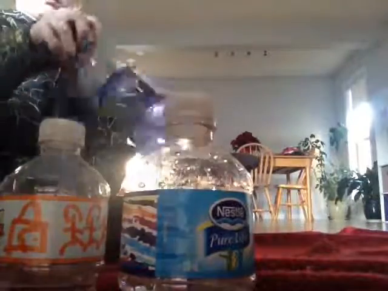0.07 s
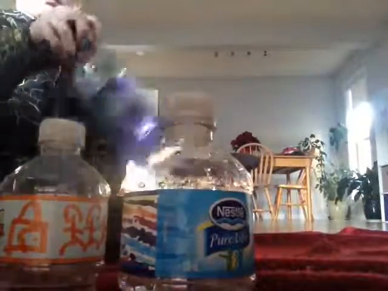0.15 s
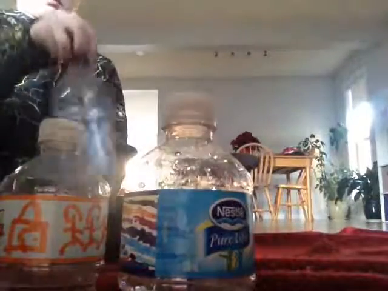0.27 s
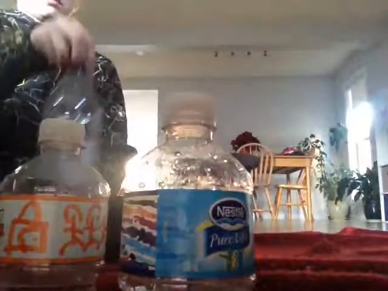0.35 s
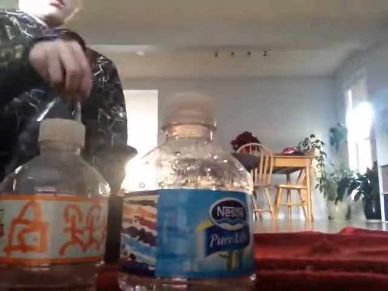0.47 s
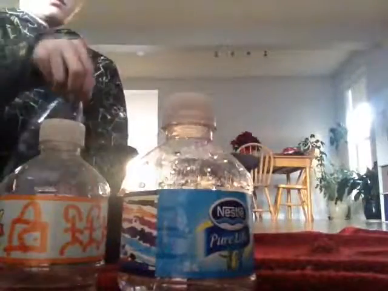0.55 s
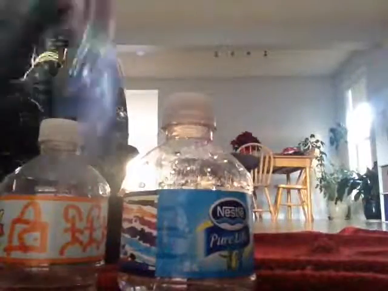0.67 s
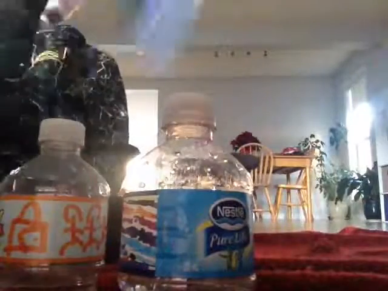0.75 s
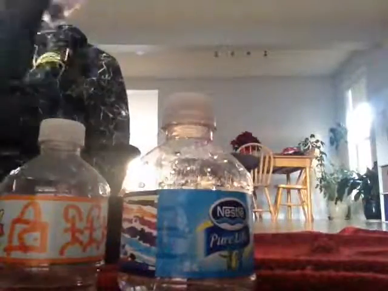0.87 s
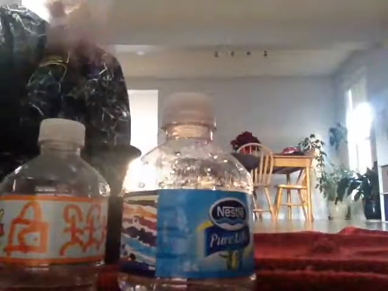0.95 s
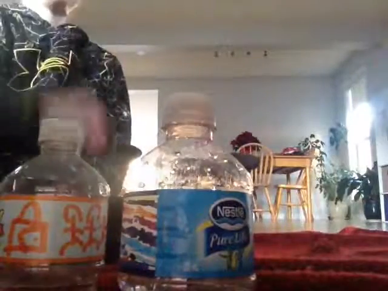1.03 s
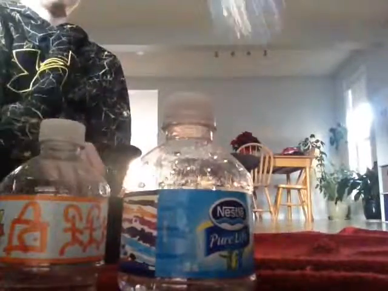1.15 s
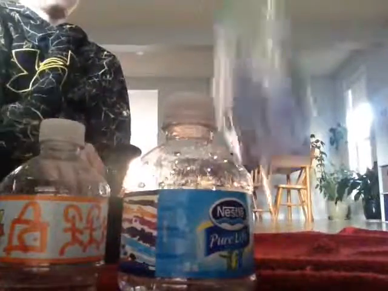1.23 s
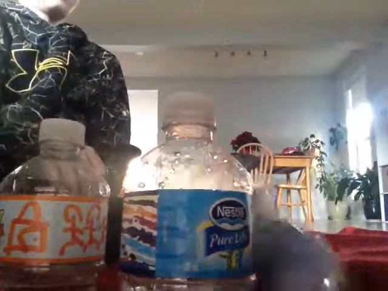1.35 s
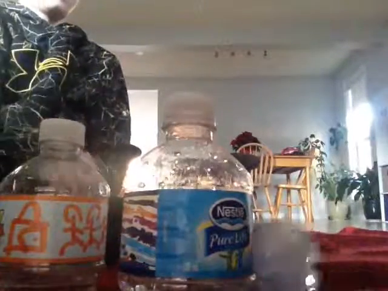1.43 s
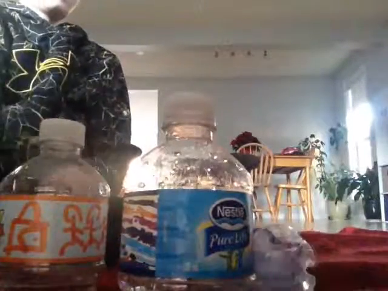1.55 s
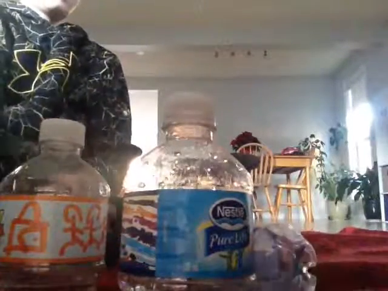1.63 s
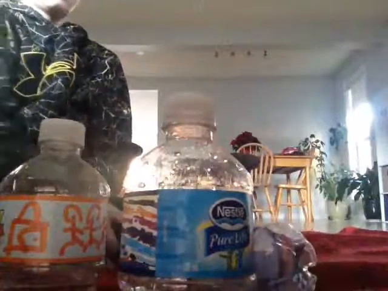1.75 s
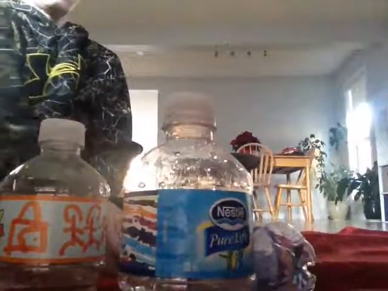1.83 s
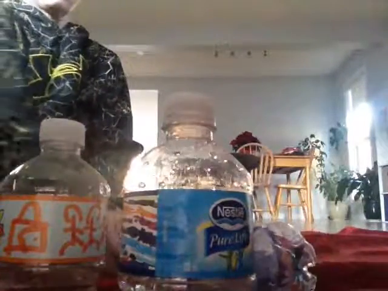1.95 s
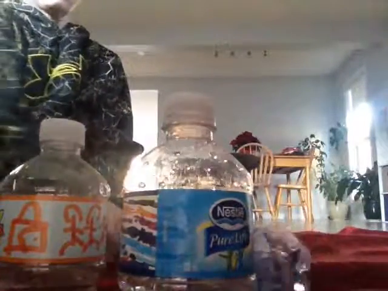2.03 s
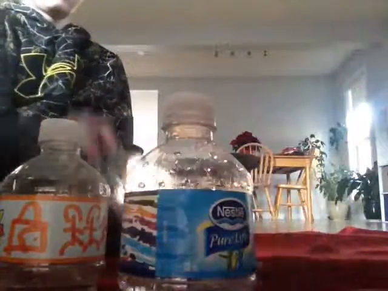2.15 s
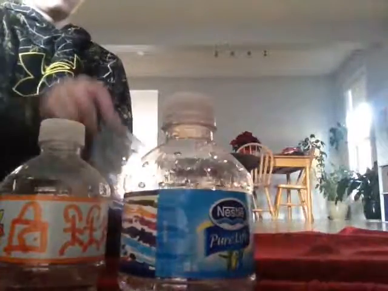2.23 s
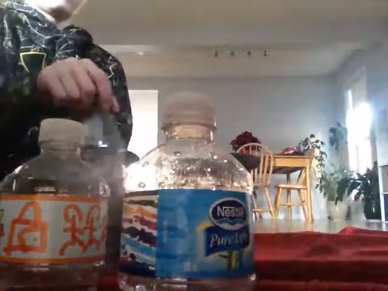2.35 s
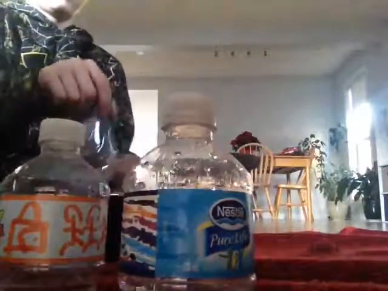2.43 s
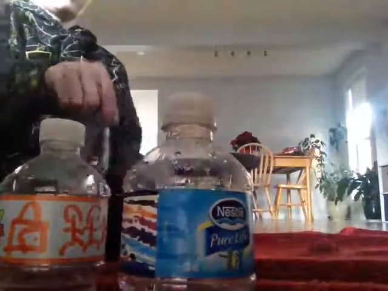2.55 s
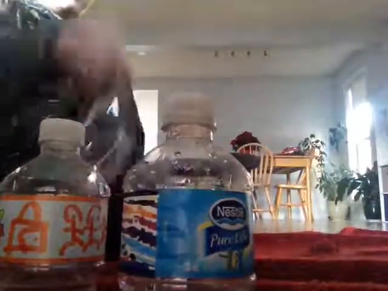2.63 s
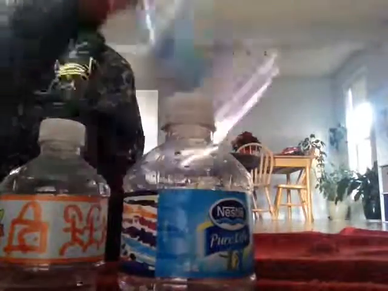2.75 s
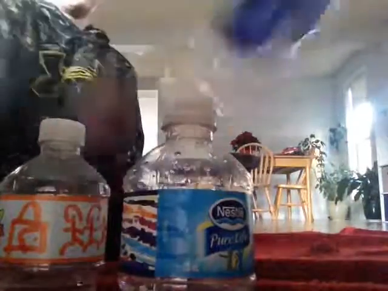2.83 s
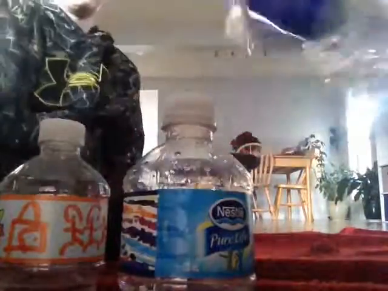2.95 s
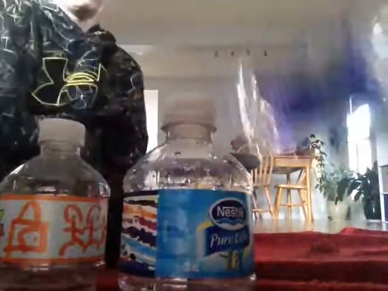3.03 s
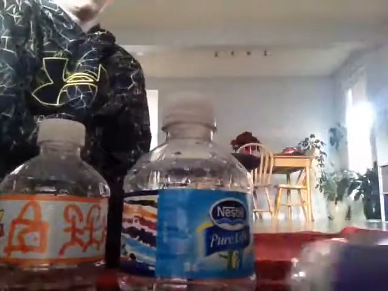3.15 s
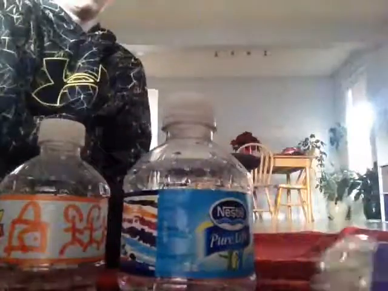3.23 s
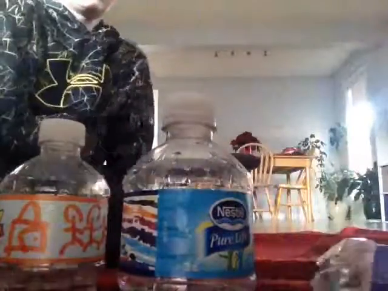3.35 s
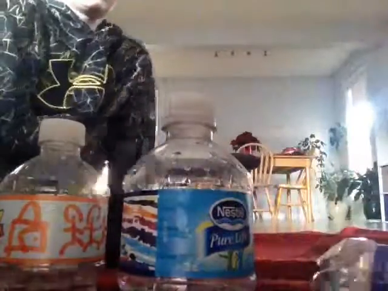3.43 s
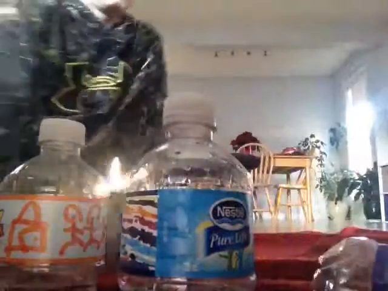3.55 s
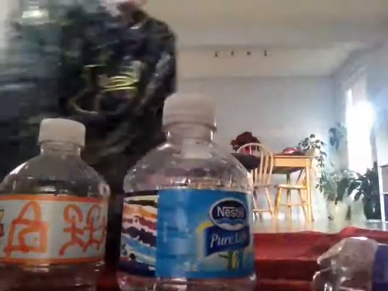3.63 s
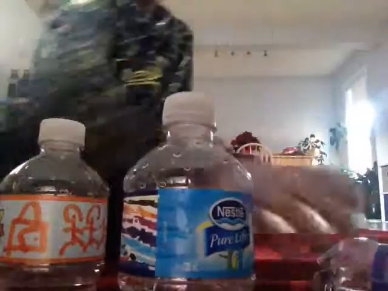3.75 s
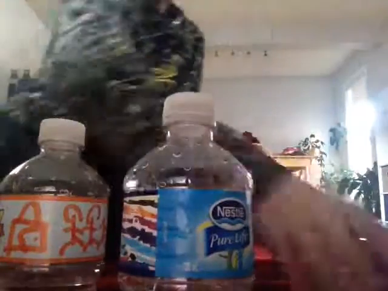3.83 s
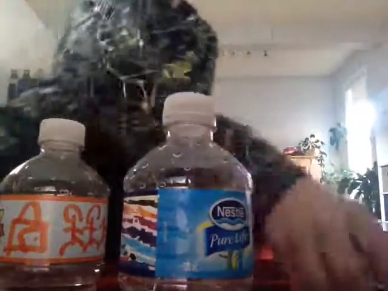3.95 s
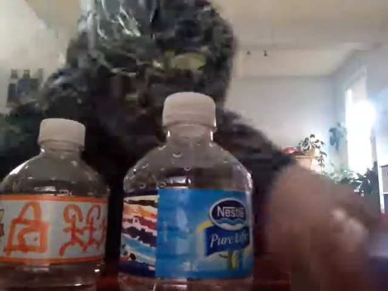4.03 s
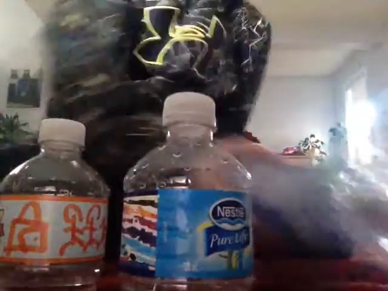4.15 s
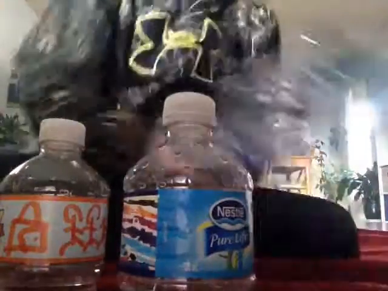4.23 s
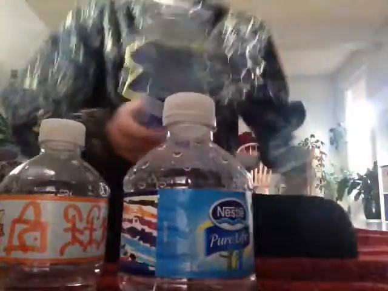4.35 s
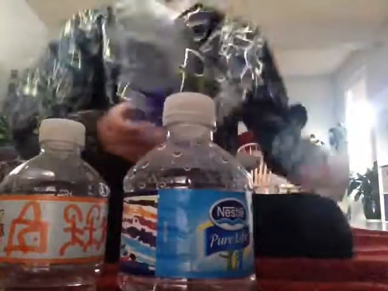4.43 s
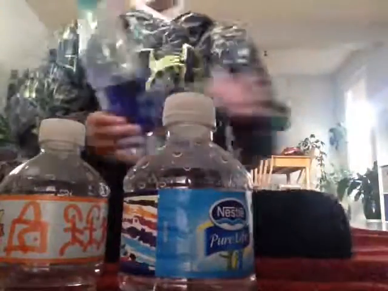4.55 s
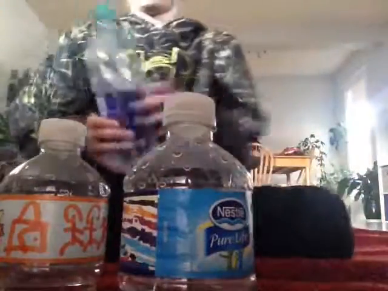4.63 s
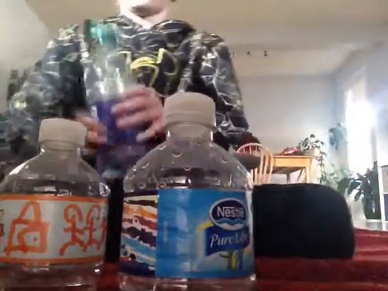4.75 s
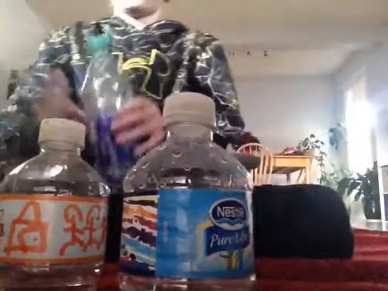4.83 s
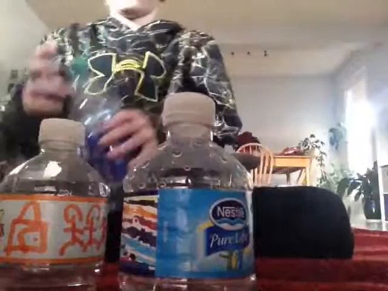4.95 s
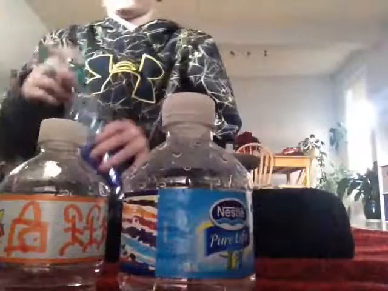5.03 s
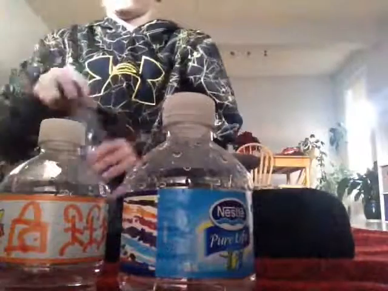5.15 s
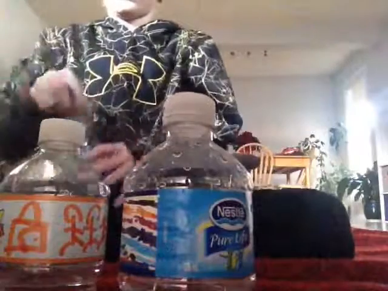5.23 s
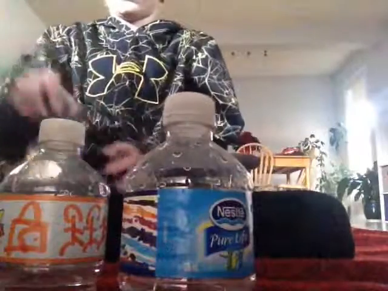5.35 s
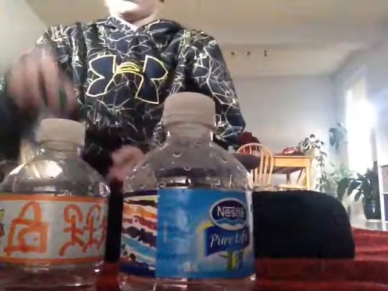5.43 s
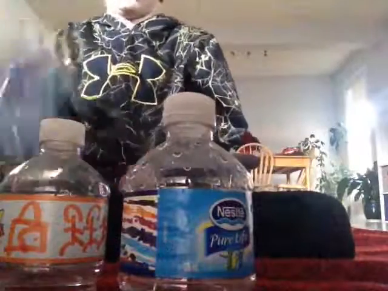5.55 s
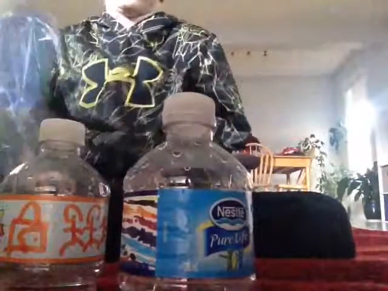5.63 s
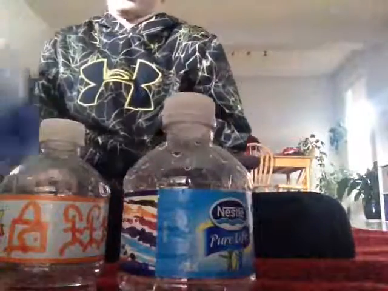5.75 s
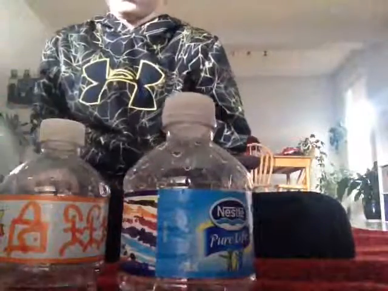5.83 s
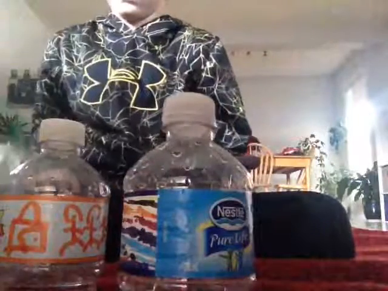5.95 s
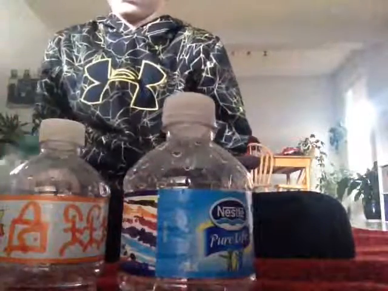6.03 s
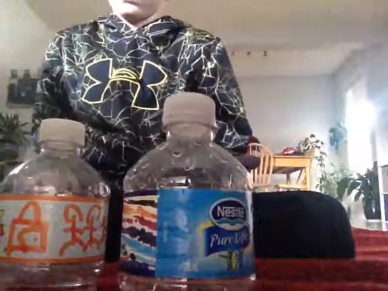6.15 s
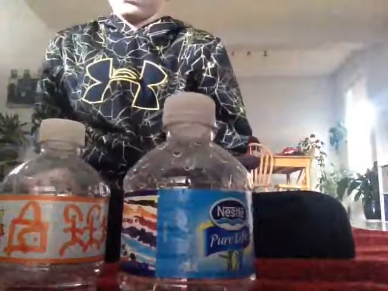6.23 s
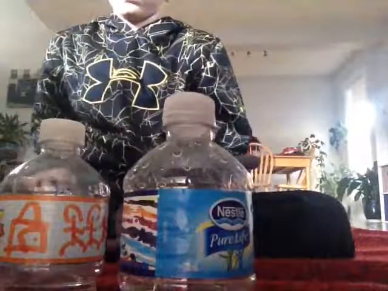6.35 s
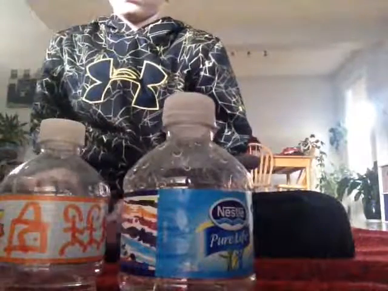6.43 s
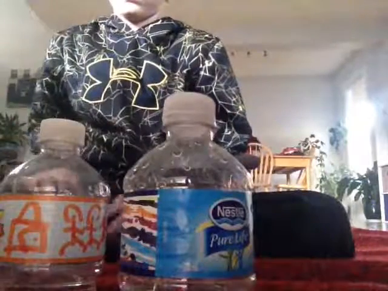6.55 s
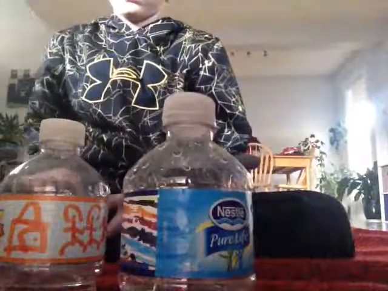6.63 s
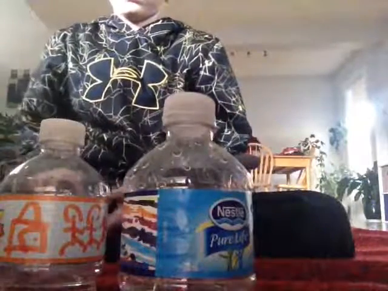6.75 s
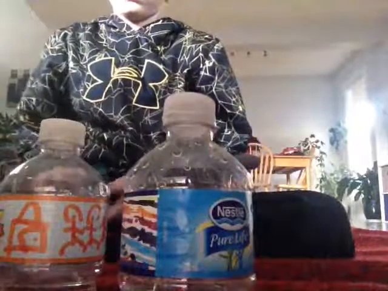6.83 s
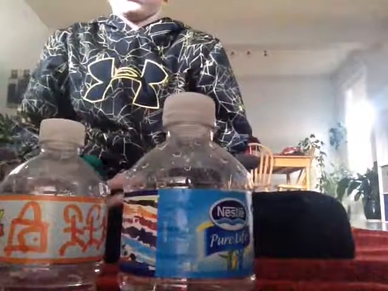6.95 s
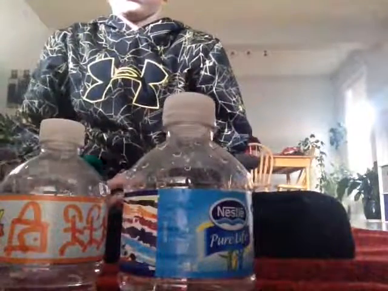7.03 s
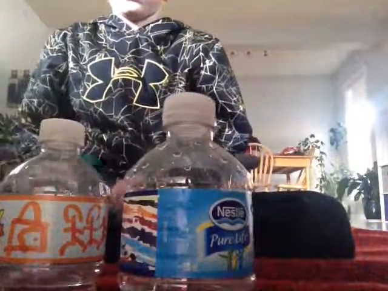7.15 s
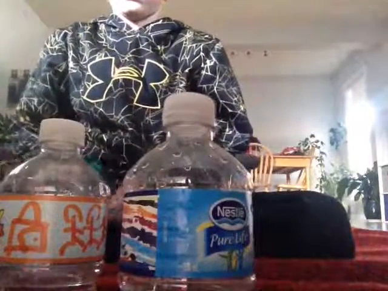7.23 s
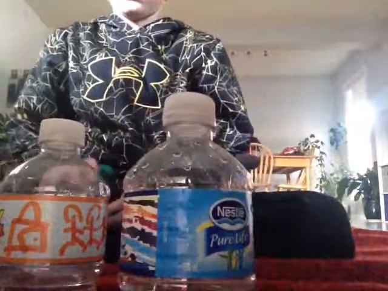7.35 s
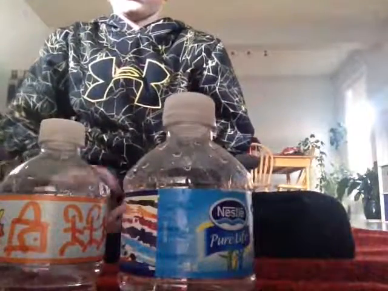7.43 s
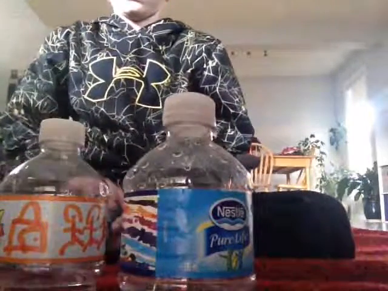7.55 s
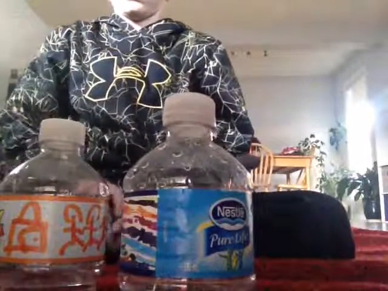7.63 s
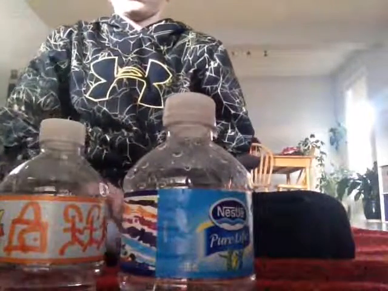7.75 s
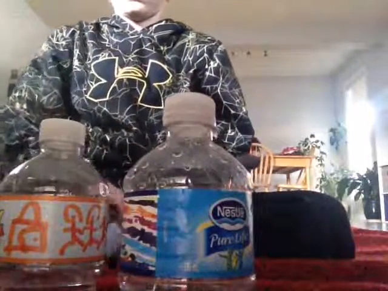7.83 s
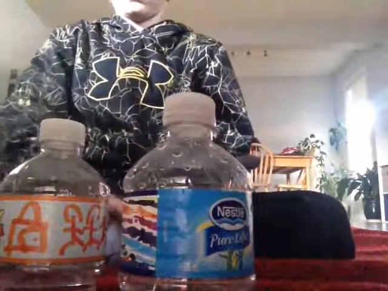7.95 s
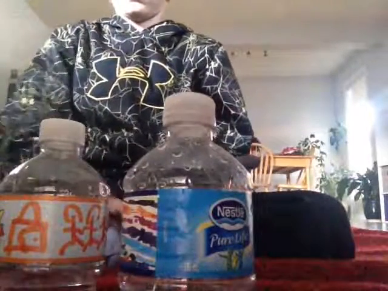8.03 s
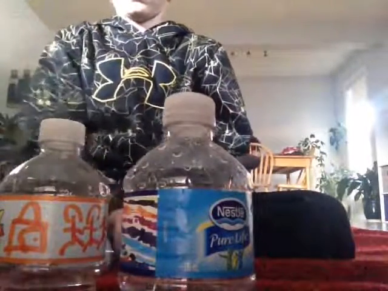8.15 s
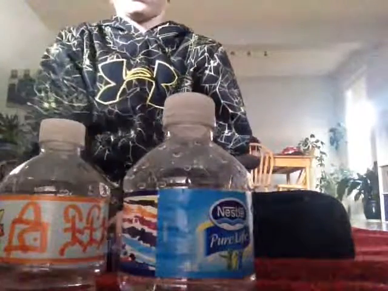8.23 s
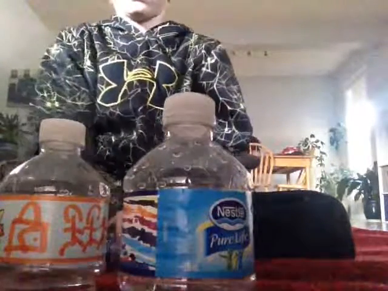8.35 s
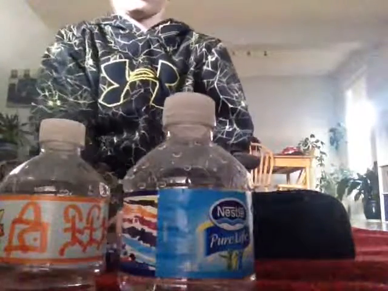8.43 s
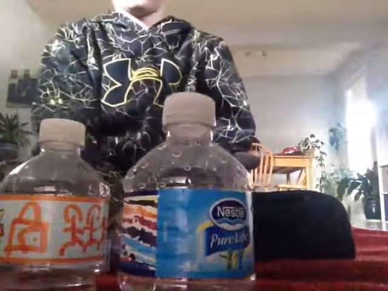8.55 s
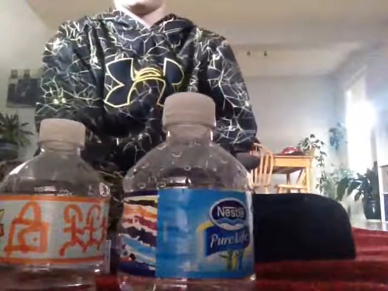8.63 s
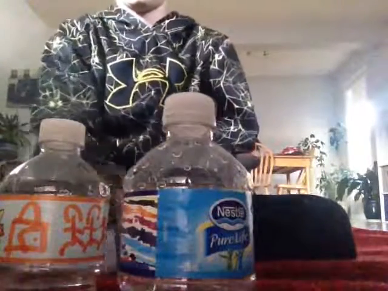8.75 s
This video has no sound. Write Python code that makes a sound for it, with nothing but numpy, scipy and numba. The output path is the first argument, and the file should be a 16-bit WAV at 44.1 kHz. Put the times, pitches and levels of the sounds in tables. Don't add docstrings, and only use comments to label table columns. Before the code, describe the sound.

A quiet small room with faint appliance hum and microphone hiss. Around 0.9-1.1 s water slaps lightly inside a plastic bottle, and a soft low tone rises until a loud, deep thud at 1.33 s on carpeted wooden floor, with a brief plastic ring and small bounces. From 1.7 to 2.4 s thin walls pop and crackle softly. At 2.85 s a sharp slosh and crack begin the second flip, fizzing with bright spray until a lighter, harder landing at 3.1 s, with slaps and settling until 3.4 s. A hollow plastic tap sounds at 3.53 s. Sleeves rub and fingers tick and knock on plastic from 3.7 to 4.8 s. A snappy slosh at 5.6 s leads to a heavy, softer-edged boom at 5.86 s. Afterwards there are small pops at 6.0-6.9 s, then quiet cloth rubbing and dull bumps, strongest near 7.8-8.3 s, fading towards 9 s.

```python
import sys
import numpy as np
from scipy import signal
from scipy.fft import rfft, irfft
from scipy.io import wavfile
from scipy.ndimage import uniform_filter1d
from numba import njit

SR = 44100
rng = np.random.default_rng(int(sys.argv[2]) if len(sys.argv) > 2 else 0)


def volts_from_decibels(level):
    exponent = np.asarray(level, float) / 20
    return 10 ** exponent


def generate_wav(signal):
    frames = np.transpose(np.atleast_2d(signal))
    scaled = np.clip(frames, -1, 1) * 32767
    pcm = np.round(scaled).astype(np.int16)
    wavfile.write(sys.argv[1], SR, pcm)


N = 387638
SILENT_DB = -110
MIST_HZ = 10500

# start_s, peak_db, floor_pitch_hz, swell_ms, hardness of first touch (0-1)
FLOOR_BLOWS = [
    (1.3327, 8, 159, 7.6, 0.73),
    (3.0991, -2, 134, 14, 0.97),
    (5.8645, 8, 176.5, 7.6, 0.27),
]
# bottle_wall_db, floor_boom_db, boom_fade_db_per_s
AFTER_RING = [
    (-10, -29, 95),
    (-22, -23.5, 190),
    (-21, -23.5, 105),
]


def unit(x):
    return x / np.sqrt(np.mean(x ** 2))


def band(x, lo_hz, hi_hz):
    sos = signal.butter(2, [lo_hz, min(hi_hz, .45 * SR)], "band", fs=SR, output="sos")
    return unit(signal.sosfilt(sos, x))


def thin(x, hz):
    return signal.sosfilt(signal.butter(4, hz, "high", fs=SR, output="sos"), x)


def walk(rate):
    hold = int(SR / rate)
    steps = np.repeat(rng.standard_normal(N // hold + 1), hold)
    return unit(uniform_filter1d(uniform_filter1d(steps, hold), hold)[:N])


@njit
def ring(n, start, hz, t60, size, glide, sr):
    out = np.zeros(n)
    for k in range(len(hz)):
        life = int(t60[k] * sr) + 1
        z = size[k] + 0j
        p = np.exp(2j * np.pi * hz[k] / sr - np.log(1000) / life)
        turn = np.exp(2j * np.pi * hz[k] / sr * glide[k] / life)
        first = int(start[k] * sr)
        for i in range(first, min(n, first + life)):
            out[i] += z.imag
            z *= p
            p *= turn
    return out


def grains(rate, lo_hz, hi_hz, cycles, spread_db, glide, bed_db):
    when, pitch, luck = rng.random((int(rate * N / SR), 3)).T
    hz = lo_hz * (hi_hz / lo_hz) ** pitch
    size = volts_from_decibels(-spread_db * np.log(1.002 - luck))
    rings = ring(N, when * N / SR, hz, cycles / hz, size, glide + 0 * hz, 1. * SR)
    mix = unit(rings) + volts_from_decibels(bed_db) * band(rng.standard_normal(N), lo_hz, hi_hz)
    return band(band(mix, lo_hz, hi_hz), 0.85 * lo_hz, 1.6 * hi_hz)


def add_puff(out, s, db, rise_s, fall_s, lo_hz, hi_hz):
    t = np.arange(SR // 20) / SR
    puff = band(rng.standard_normal(len(t)), lo_hz, hi_hz) * (1 - np.exp(-t / rise_s)) * np.exp(-t / fall_s)
    out[int(s * SR):][:len(t)] += (volts_from_decibels(db) * puff)[:N - int(s * SR)]


def patchy(x, drift, top_db):
    top = signal.sosfiltfilt(signal.butter(2, MIST_HZ, "high", fs=SR, output="sos"), x)
    return volts_from_decibels(top_db + drift) * top + volts_from_decibels(-drift) * (x - top)


def moments():
    return np.arange(N * 1000 // SR + 2) / 1000


def smooth(gains):
    return [np.interp(np.arange(N) / SR * 1000, np.arange(len(g)), g) for g in gains]


def quiet_house():
    # pitch_hz, level_db per Hz
    spectrum = [(40, -26.5), (69, -22), (176, -4), (312, -3), (560, -11.5), (852, -14.5), (12000, -24),
                (15500, -28.5)]
    # pitch_hz, level_db
    hum = [(188.4, -67.5), (333.8, -72.5), (376.8, -81), (565.2, -84), (592.2, -63.5)]
    hz, db = np.transpose(spectrum)
    f = np.maximum(np.fft.rfftfreq(N, 1 / SR), 1)
    shape = volts_from_decibels(np.interp(np.log(f), np.log(hz), db))
    out = volts_from_decibels(-62) * unit(irfft(rfft(rng.standard_normal(N)) * shape, N))
    casing_hz, width_hz = 555, 147
    out += volts_from_decibels(-70.5) * band(rng.standard_normal(N), casing_hz - width_hz / 2, casing_hz + width_hz / 2)
    for line_hz, line_db in hum:
        turns = np.cumsum(line_hz * (1 + 0.003106 * walk(8.8))) / SR
        out += volts_from_decibels(line_db + 1.5 + 0.86 * walk(4.4)) * np.sin(2 * np.pi * turns)
    return out


def slaps():
    # start_s, peak_db, wall_pitch_hz, fizz_db
    water = [(0.868, -45, 2080, -16), (0.889, -47.5, 670, 4.5), (0.912, -36.5, 1600, -15),
             (1.094, -36, 2040, -16), (1.06, -43, 4950, -16), (1.099, -39.5, 3500, -17),
             (1.145, -40.5, 1394, -17), (2.842, -26.5, 2540, -15.5), (2.867, -14.5, 567, -10),
             (2.951, -23.5, 2310, -22), (3.016, -24.5, 1700, -25), (3.099, -33, 4050, -18),
             (3.14, -24, 1300, -20), (3.176, -24, 1210, -21), (3.202, -33, 1510, -22),
             (3.225, -17, 900, -8), (3.329, -31, 910, -16), (5.6294, -17.5, 960, -21),
             (5.625, -14, 423, -33), (5.68, -25.5, 1500, -6), (5.738, -34, 497, -21),
             (5.767, -34.5, 476, -25)]
    # start_s, peak_db, wall_pitch_hz, fizz_db
    knocks = [
        (4.114, -26, 1070, -13),
        (4.158, -40.5, 2520, -2),
        (4.286, -38, 1690, -19),
        (4.312, -33.5, 1510, -8),
        (4.37, -37, 574, -17),
        (4.476, -40, 1910, -26),
        (4.685, -37, 634, -1),
        (7.959, -43, 705, -25),
        (8.768, -41.5, 600, -11),
        (8.775, -50.5, 4180, 5.5),
    ]
    # start_s, peak_db, wall_pitch_hz, thump_db
    bounces = [(1.412, -33, 566, 1), (1.427, -36, 665, -6), (1.499, -44, 906, 2), (1.521, -36, 720, -9.5),
               (3.117, -20, 753, -1), (5.606, -31, 525, -10), (5.627, -22, 1000, 2), (5.895, -17, 965, -14),
               (6.044, -29.5, 706, -8), (6.135, -41, 940, -3.5), (6.672, -36.5, 600, -15),
               (7.882, -43, 601, 5)]
    slap_thump_db, knock_thump_db, bounce_fizz_db = -13, -27, -20.5
    rows = [(*row, slap_thump_db) for row in water] + [(*row, knock_thump_db) for row in knocks]
    rows += [(s, db, hz, bounce_fizz_db, thump_db) for s, db, hz, thump_db in bounces]
    wall, thump = np.zeros(N), np.zeros(N)
    order = np.linspace(0, 1, 14)
    for s, db, hz, fizz_db, thump_db in rows:
        late, size, side = rng.random((3, 14))
        shift = 2.2 * (side - .5) * order
        pitch = np.clip(hz * 2 ** shift, 300, 6000)
        share_db = db - 9.0 - 8 * order ** 0.7 - 4 * size * order
        start = s + 0.002964 * late * order ** .4
        wall += ring(N, start, pitch, .012 + 11 / pitch, volts_from_decibels(share_db), .06 + 0 * pitch, 1. * SR)
        add_puff(wall, s, db + fizz_db, rise_s=0.0013, fall_s=0.0035, lo_hz=3500, hi_hz=14600)
        add_puff(wall, s, db - 15.5, rise_s=0.00071, fall_s=0.0025, lo_hz=hz / 2, hi_hz=4 * hz)
        add_puff(thump, s, db + thump_db, rise_s=0.003, fall_s=0.0082, lo_hz=109, hi_hz=321)
    return thin(wall, 221) + thin(thump, 125)


def through_wall(x):
    # pitch_hz, width_hz, level_db
    resonances = [(394, 190, -7.5), (1420, 250, -1), (1720, 110, -2.5), (2590, 718, -14.5), (3630, 610, 5)]
    out = 0.89 * x
    for hz, width, db in resonances:
        out = out + volts_from_decibels(db) * signal.lfilter(*signal.iirpeak(hz, hz / width, SR), x)
    return unit(out)


def surge(s, db, rise_s, fade):
    t = np.clip(moments() - s, 0, None)
    return (np.clip(t / rise_s, 0, 1) * volts_from_decibels(db - fade * np.clip(t - rise_s, 0, 1))) ** 2


def water_gains():
    # start_s, gurgle_db, fade_db_per_s, then against the gurgle trickle_db, spray_db
    surges = [(0.875, -55.5, 150, -1.5, -10), (1.02, -52, 260, 2.5, -1), (1.085, -77, 71, 20.5, 15),
              (1.332, -28, 300, -9, -7.5), (1.403, -38.5, 170, -9.5, -19), (1.5, -48, 109, -19.5, -25),
              (2.834, -35.5, 404, -4, -11), (2.859, -35.5, 300, -1, -7), (2.929, -42.5, 86, -1.5, -3.5),
              (2.977, -41.5, 480, -0.5, -10), (3.101, -24.5, 148, -8, -10), (3.192, -34.5, 200, -2.5, -7),
              (3.222, -42, 151, -6, -2), (3.321, -48, 99, -7, -14), (3.421, -55, 38, -7.5, -8.5),
              (5.576, -48.5, 100, -6, -8.5), (5.601, -29.5, 222, -8, -10), (5.673, -43, 149, -2.5, 2.5),
              (5.703, -47, 200, 1.5, -0.5), (5.75, -47.5, 149, -3, -18), (5.865, -27, 400, -14, -12.5),
              (5.899, -41, 64.4, -9, -12)]
    # start_s, level_db, fade_db_per_s
    mists = [
        (2.95, -46, 135),
        (3.099, -68, 263),
        (3.38, -59.5, 18.5),
        (3.528, -57, 450),
        (5.862, -49, 299.5),
    ]
    rise_s, boom_rise_s = 0.0094, 0.0027
    spray_fade = 1.3
    weight_db = -8.5
    gurgle = sum(surge(s, db, rise_s, fade) for s, db, fade, _, _ in surges)
    trickle = sum(surge(s, db + up, rise_s, fade) for s, db, fade, up, _ in surges)
    spray = sum(surge(s, db + up, rise_s, spray_fade * fade) for s, db, fade, _, up in surges)
    mist = sum(surge(s, db, rise_s, fade) for s, db, fade in mists)
    floor = sum(surge(row[0], db, boom_rise_s, fade) for row, (_, db, fade) in zip(FLOOR_BLOWS, AFTER_RING))
    return smooth(np.sqrt([floor + volts_from_decibels(2 * weight_db) * gurgle, gurgle, trickle, spray, mist]))


def slosh():
    boom, gurgle, trickle, spray, mist = water_gains()
    out = boom * grains(rate=260, lo_hz=120, hi_hz=260, cycles=5, spread_db=1, glide=0., bed_db=3)
    bubbles = grains(rate=300, lo_hz=322.8, hi_hz=1155, cycles=32, spread_db=2.0, glide=0.441, bed_db=-6.5)
    out += gurgle * through_wall(bubbles)
    drops = grains(rate=600, lo_hz=1210, hi_hz=3500, cycles=29, spread_db=3.0, glide=0.12, bed_db=-0.5)
    out += trickle * through_wall(drops)
    flicker = walk(45)
    fizz = grains(rate=4000, lo_hz=3800, hi_hz=15400, cycles=24, spread_db=3.5, glide=0.069, bed_db=-5.5)
    out += spray * volts_from_decibels(0.52 * flicker) * patchy(fizz, 1.8 * flicker[::-1], top_db=2.5)
    out += mist * volts_from_decibels(2.5 * walk(60)) * unit(thin(fizz, MIST_HZ))
    return out


def panels():
    # start_s, peak_db, pitch_hz, t60_s
    struck = [(1.336, -32, 3890, 0.043), (1.336, -18.5, 1710, 0.027), (1.414, -30.5, 1380, .03),
              (1.425, -36, 1450, 0.07), (1.4, -46.5, 6700, 0.018), (2.809, -52, 2400, .03),
              (2.84, -29, 590, 0.036), (2.845, -20.5, 1940, 0.02), (2.848, -20.5, 2400, 0.013),
              (2.867, -16.5, 619, 0.072), (2.96, -34, 1870, 0.078), (3.076, -38, 1490, 0.024),
              (3.112, -22.5, 3305, 0.039), (3.121, -28, 3250, .025), (3.167, -21.5, 1080, 0.047),
              (3.205, -18, 537, 0.042), (3.215, -25.5, 3340, 0.023), (3.292, -38, 980, .03),
              (3.366, -32, 1080, 0.015), (3.112, -11.5, 510, 0.084), (3.645, -44, 690, 0.18),
              (4.285, -41, 1700, .06), (4.47, -41, 1905, 0.1), (4.626, -51, 3300, 0.027),
              (5.583, -35.5, 420, 0.033), (5.61, -31, 2700, .02), (5.617, -33, 2550, .02),
              (5.6305, -4, 646, 0.0093), (5.6261, -14, 1000, 0.012), (5.632, -14.5, 360, .05),
              (5.668, -26.5, 330, 0.13), (2.867, -20, 435, 0.053), (2.867, -21, 1730, .013),
              (2.951, -21, 1940, 0.014), (2.951, -23, 2780, .012), (3.223, -17, 1000, 0.021),
              (1.984, -42, 1530, 0.01), (2.114, -41, 1210, 0.058), (.889, -41, 2570, .02),
              (0.914, -38, 2540, .025), (.915, -50, 3300, .02), (1.09, -44, 3980, 0.033),
              (1.055, -43, 1750, .05), (3.224, -24, 527, 0.033), (5.736, -33, 1420, 0.029),
              (5.76, -27.5, 2670, 0.018), (5.773, -35, 2800, 0.02), (5.912, -26, 800, .025),
              (5.927, -28, 700, .025), (6.019, -34.5, 1070, .03)]
    # start_s, peak_db, pitch_hz, t60_s
    thumps = [
        (1.379, -20, 170, 0.055),
        (1.402, -16, 210, 0.055),
        (1.44, -29, 200, .09),
        (2.957, -30, 200, .05),
        (3.179, -25, 150, 0.077),
        (3.222, -19, 150, 0.038),
        (3.259, -28, 140, 0.09),
        (5.604, -21, 229, 0.043),
    ]
    s, db, hz, t60 = np.transpose(struck + thumps)
    side, late = rng.random((len(s), 2)).T
    first = ring(N, s, hz, t60, volts_from_decibels(db - 2.5), .03 + 0 * hz, 1. * SR)
    near_hz = hz * (0.85 + .14 * side)
    second = ring(N, s + 0.00127 * late, near_hz, 0.92 * t60, volts_from_decibels(db - 7), 0 * hz, 1. * SR)
    return thin(first + second, 125)


def sheets():
    # centre_s, length_s, level_db, centre_hz
    hisses = [(2.985, .06, -42, 13500), (2.95, .035, -42, 10000), (3.12, .044, -38, 9600),
              (5.715, .05, -46.5, 6200), (3.845, .085, -51, 8800), (3.93, .08, -57, 8000),
              (1.52, .12, -51, 1250), (3.61, .19, -64, 10500), (3.3, .08, -56.5, 8600),
              (4.0, .091, -57.5, 11000), (4.395, .04, -57, 9100), (4.686, .022, -52, 8000),
              (7.875, .09, -48, 610), (7.97, .06, -49.5, 620), (8.0, .087, -55.5, 1120),
              (8.22, .1, -50.5, 525), (8.14, .066, -55, 520), (5.895, .1, -51.5, 3600),
              (8.2, .15, -64, 8200), (5.868, .022, -41, 14800), (1.41, .12, -54.5, 7600),
              (.93, .1, -64, 2350)]
    out, half = np.zeros(N), 2 ** (0.91 / 2)
    flicker = volts_from_decibels(2.5 * walk(150))
    t = np.arange(-SR // 10, SR // 10)
    for s, length, db, hz in hisses:
        swell = np.cos(np.pi * np.clip(t / SR / length, -.5, .5)) ** 2
        hiss = band(band(rng.standard_normal(len(t)), hz / half, hz * half), hz / half, hz * half)
        out[int(s * SR) + t] += volts_from_decibels(db) * swell * hiss
    return flicker * out


def air():
    # time_s, pitch_hz, level_db
    glide = [
        (1.02, 97.2, -85),
        (1.04, 98, -70),
        (1.1, 105, -63),
        (1.17, 125, -57),
        (1.22, 161, -47.5),
        (1.27, 192.5, -59.5),
        (1.321, 198, -49),
    ]
    s, hz, db = np.transpose(glide)
    t = np.arange(N) / SR
    level = volts_from_decibels(np.interp(t, s, db, left=SILENT_DB, right=SILENT_DB) + 4.0 * walk(40))
    return level * np.sin(2 * np.pi * np.cumsum(np.interp(t, s, hz)) / SR)


def pops():
    # start_s, peak_db, low_panel_hz, high_panel_hz, high_panel_db
    dents = [(1.744, -44, 1077, 1360, -7), (1.78, -54, 1243, 6480, -10), (1.981, -36, 715, 3520, -0.5),
             (2.059, -41.5, 613, 1670, 8.5), (2.08, -54, 1630, 3200, 9), (2.114, -37.5, 784, 1640, -4),
             (2.215, -46.5, 630, 1320, -6), (2.254, -42.5, 650, 1390, 5.5), (2.303, -40, 970, 1250, -6),
             (2.32, -45, 437, 1390, 2), (2.366, -47, 560, 900, 0), (2.379, -43.5, 570, 1720, -9),
             (4.439, -29, 444, 1910, -25), (4.801, -52.5, 573, 2360, 4), (4.972, -30, 495, 1420, -29),
             (5.04, -47.5, 491, 2550, -3), (5.865, -13.5, 443, 1714, -31), (6.272, -42, 1026, 1436, -31),
             (6.42, -33.5, 418, 2910, -3.5), (6.506, -40.5, 460, 3500, -4), (6.854, -31, 447, 1656, -5),
             (6.854, -49.5, 882, 3500, 10)]
    # start_s, crack_db, panel_hz, panel_db, other_panel_hz
    snaps = [
        (1.0276, -57, 1820, -20, 1190),
        (1.327, -56, 876, -33.5, 2490),
        (2.866, -27, 686, -20, 525),
        (3.2044, -42, 920, -21, 3330),
        (3.025, -38.5, 2260, -34, 420),
        (3.098, -31, 495, -26, 3060),
        (4.0622, -39, 5830, -25, 870),
        (4.07, -42, 900, -34.5, 5530),
        (6.006, -41.5, 455, -34.5, 1506),
    ]
    rows = [(*row, -21.5 + 10 * np.log2(row[3] / 1500)) for row in dents]
    second_db = -9.5
    rows += [(s, db, hz, other_hz, second_db, crack_db - db) for s, crack_db, hz, db, other_hz in snaps]
    out = np.zeros(N)
    for s, db, low_hz, high_hz, high_db, crack_db in rows:
        shift, late = rng.random((2, 12))
        between = low_hz * (1.1 * high_hz / low_hz) ** shift[:8]
        pitch = np.r_[low_hz, 1.075 * low_hz, high_hz, .92 * high_hz, between]
        share_db = np.r_[0.5, -4, high_db + .6, high_db - 3, .6 * high_db - 6 - 4 * late[:8]]
        decay = np.r_[.022, .018, .013, .01, .014 + 0 * between] * np.minimum(1, 900 / low_hz)
        out += ring(N, s + 0.0017 * late, pitch, decay, volts_from_decibels(db + share_db), 0 * pitch, 1. * SR)
        add_puff(out, s, db + max(high_db, 0) - 8.5, rise_s=.0002, fall_s=0.00064,
                 lo_hz=low_hz / 2 + 200, hi_hz=1.6 * max(low_hz, high_hz))
        add_puff(out, s, db + crack_db, rise_s=0.00011, fall_s=0.0017, lo_hz=4390, hi_hz=10500)
    return thin(out, 421)


def ticks():
    # start_s, peak_db, centre_hz, width_octaves
    touches = [(1.182, -48, 6950, 0.63), (1.221, -47, 3000, .5), (1.448, -44, 8000, 1.1),
               (1.484, -50, 9000, .6), (1.521, -48, 5000, .2), (1.54, -49, 8000, .8),
               (1.647, -49, 6200, .9), (2.848, -20.5, 9500, 1.2), (2.868, -24, 13000, 0.45),
               (2.932, -33, 9400, 0.45), (2.963, -20, 13500, .3), (2.968, -21, 13500, .4),
               (2.982, -30, 14000, .4), (2.999, -35, 12500, .3), (3.024, -29, 12700, .5),
               (3.034, -37, 12000, .5), (3.098, -9, 12600, 0.59), (3.168, -30, 10500, .6),
               (3.2045, -15.5, 1900, 1.5), (3.238, -21.5, 3000, 1.2), (3.285, -34.5, 7200, .9),
               (3.301, -38, 3900, .8), (3.344, -39, 10100, 0.88), (3.423, -43, 10500, .4),
               (3.523, -30.5, 11000, .5), (4.062, -24.5, 11100, 0.39), (4.106, -47, 11500, .4),
               (4.113, -36, 12500, .5), (4.146, -41, 12500, .6), (4.152, -35, 9800, 0.42),
               (4.191, -42, 8800, .3), (4.21, -44, 9500, .4), (4.246, -42, 9000, .8),
               (4.259, -43, 11000, .4), (4.304, -36.5, 7500, .6), (4.37, -34, 7860, 0.33),
               (4.384, -40, 10000, .6), (4.437, -46, 7000, .7), (4.679, -38, 8000, .8),
               (4.686, -29.5, 7900, 0.44), (4.713, -40, 8500, .4), (5.681, -27, 3500, 2),
               (5.703, -34, 7200, 0.57), (5.713, -32, 5500, .5), (5.751, -42, 5500, .3),
               (5.759, -44, 5400, 0.28), (6.008, -29.5, 4570, 1.1), (6.505, -43, 7000, .3),
               (6.42, -41, 7200, 0.36), (7.038, -42, 1000, 1.5), (7.513, -42, 2800, 1.1)]
    out = np.zeros(N)
    for s, db, hz, octaves in touches:
        half = 2 ** (octaves / 2)
        add_puff(out, s, db - 2.5, rise_s=0.00018, fall_s=0.001, lo_hz=hz / half, hi_hz=hz * half)
    return out


def landings():
    # pitch_hz, level_db, t60_s
    bottle = [(465, 2, 0.03), (495, 2.5, 0.04), (556.6, -13.5, 0.036), (742, -19.5, 0.053),
              (841, -9.5, 0.026)]
    out, t = np.zeros(N), np.arange(SR // 5) / SR
    hz, db, t60 = np.transpose(bottle)
    for (s, peak_db, floor_hz, swell_ms, hardness), (wall_db, *_) in zip(FLOOR_BLOWS, AFTER_RING):
        first = int(s * SR)
        u = 1000 * t / swell_ms
        turns = floor_hz * (t + hardness * 0.0031 * (1 - np.exp(-t / 0.0017)))
        swell = u ** (1 - hardness) * np.exp(-u ** 1.48)
        out[first:][:len(t)] += volts_from_decibels(peak_db) * swell * np.sin(2 * np.pi * turns)
        out[first - len(t):first] -= (volts_from_decibels(peak_db - 25.0) * t / 0.00087 * np.exp(-t / 0.0013))[::-1]
        detune, late = rng.random((len(hz), 2)).T
        start = s + 0.0018 + 0.00513 * late
        out += ring(N, start, hz * (.97 + 0.11 * detune), t60, volts_from_decibels(db + wall_db), 0 * hz, 1. * SR)
    return out


def knees():
    # start_s, level_db
    shifts = [
        (3.36, -48),
        (3.87, -54),
        (4.07, -62),
        (4.44, -53),
        (4.67, -53),
        (6.41, -58),
        (1.62, -60),
        (1.72, -64),
        (1.82, -67),
        (4.58, -56),
    ]
    out = np.zeros(N)
    for s, db in shifts:
        add_puff(out, s, db, rise_s=.008, fall_s=0.017, lo_hz=40, hi_hz=100)
    return signal.sosfilt(signal.butter(2, 110, fs=SR, output="sos"), out)


def cloth_gains():
    # time_s, effort_db, brightness_db
    reach = [
        (3.54, -83, -11),
        (3.68, -61.5, -5.5),
        (3.8, -54, -2),
        (4.1, -53.5, 0.5),
        (4.3, -55, -2.5),
        (4.55, -54, -4.5),
        (4.72, -57, -1),
        (4.85, -68.5, -1.5),
        (5.1, -74.5, -3.5),
    ]
    # centre_s, length_s, effort_db, brightness_db
    strokes = [(2.06, 0.28, -78.5, 8), (2.328, 0.35, -60, -6.5), (3.94, .07, -70, 9), (4.4, 0.04, -60, 1),
               (4.687, 0.048, -55.5, 3), (5.222, .14, -61.5, -7), (6.378, 0.092, -55.5, -7.5),
               (6.447, 0.22, -61, -1), (6.725, 0.44, -58.5, -5.5), (6.871, 0.12, -58, -2.5),
               (7.567, 0.92, -64.5, -4), (7.826, 0.11, -51, -16), (7.885, 0.16, -50.5, -9.5),
               (7.973, 0.21, -57.5, -7.5), (8.027, 0.14, -65, -3), (8.14, 0.34, -54.5, -6.5),
               (8.23, 0.17, -53.5, -10.5), (8.367, 0.35, -59.5, -5), (8.628, 0.99, -65.5, -1.5)]
    layer_db = [-1, 2, 1, -3.5]
    layer_tilt = [1.5, 0.19, 1.4, 1.11]
    t = moments()
    s, effort_db, bright_db = np.transpose(reach)
    effort = volts_from_decibels(np.interp(t, s, effort_db, left=SILENT_DB, right=SILENT_DB))
    efforts = [(effort, np.interp(t, s, bright_db))]
    for s, length, db, bright in strokes:
        swell = np.cos(np.pi * np.clip((t - s) / length, -.5, .5)) ** 2
        efforts.append((volts_from_decibels(db) * swell, bright))
    gains = []
    for db, tilt in zip(layer_db, layer_tilt):
        power = sum((gain * volts_from_decibels(db + tilt * bright)) ** 2 for gain, bright in efforts)
        gains.append(np.sqrt(power))
    return smooth(gains)


def cloth():
    rumble, rub, scuff, swish = cloth_gains()
    grip = walk(25)
    out = rumble * grains(rate=28, lo_hz=125, hi_hz=304, cycles=4.3, spread_db=3.5, glide=0., bed_db=5.0)
    rubbing = grains(rate=310, lo_hz=300, hi_hz=1000, cycles=10, spread_db=2.0, glide=0.085, bed_db=-0.5)
    out += rub * volts_from_decibels(2.3 * grip) * rubbing
    scuffing = grains(rate=900, lo_hz=1000, hi_hz=4700, cycles=13, spread_db=1.5, glide=0., bed_db=1.0)
    out += scuff * volts_from_decibels(1.4 * grip + 1.1 * walk(70)) * band(scuffing, 390, 2310)
    swishing = grains(rate=1500, lo_hz=3600, hi_hz=13500, cycles=14, spread_db=3, glide=0., bed_db=0)
    out += swish * volts_from_decibels(.8 * grip + 1.2 * walk(30)) * patchy(swishing, 1.5 * grip[::-1], top_db=-8)
    return out


def tap():
    # pitch_hz, level_db, t60_s
    hollow = [(460, -9, 0.079), (665, -0.5, 0.055), (690, 6, 0.044), (780, -3.5, 0.046), (870, 11, 0.0082),
              (1170, -11.5, 0.039), (3860, -17, 0.022), (4500, -7, 0.0065), (1480, -11, 0.013),
              (478, -31, 0.42)]
    start_s, peak_db = 3.5287, -13
    hz, db, t60 = np.transpose(hollow)
    rings = ring(N, start_s + 0 * hz, hz, t60, volts_from_decibels(peak_db + db), 0 * hz, 1. * SR)
    rise = np.clip((np.arange(N) / SR - start_s) / 0.0039, 0, 1)
    return thin(rise ** 2 * rings, 280)


@njit
def walls(x, lags, gain, damp):
    line, soft, out = np.zeros((8, 4096)), np.zeros(8), np.zeros(len(x))
    for i in range(len(x)):
        total = 0.
        for k in range(8):
            soft[k] += (1 - damp) * (gain[k] * line[k, (i - lags[k]) & 4095] - soft[k])
            total += soft[k]
            out[i] += soft[k] * (1 - 2 * (k % 2))
        for k in range(8):
            line[k, i & 4095] = x[i] + soft[k] - total / 4
    return out


def scene():
    house = quiet_house()
    near = slaps() + slosh() + panels() + sheets() + air() + pops()
    near += ticks() + landings() + knees() + cloth() + tap()
    room_t60_s, room_damp, room_db = 0.28, 0.44, -22
    lags = rng.integers(250, 1700, 8)
    echo = walls(near + 1e-18, lags, volts_from_decibels(-60 * lags / SR / room_t60_s), room_damp)
    return (near + volts_from_decibels(room_db) * echo + house)[None]


def band_limit(x):
    return signal.sosfilt(signal.butter(12, 16570, fs=SR, output="sos"), x)


def record(dry):
    narrow = signal.sosfilt(signal.butter(2, 60, "high", fs=SR, output="sos"), dry)
    narrow = signal.sosfilt(signal.ellip(10, .3, 36, 15330, fs=SR, output="sos"), narrow)
    held = narrow / (1 + np.abs(narrow) ** 6) ** (1 / 6)
    return band_limit(held)


dry = scene()
out = record(dry)
generate_wav(out)
```